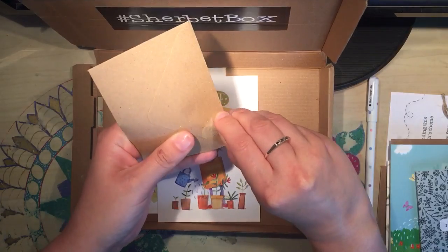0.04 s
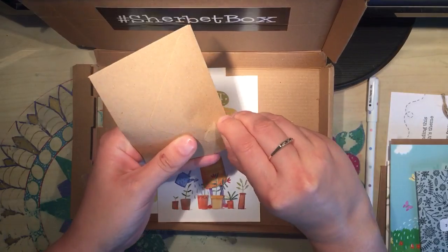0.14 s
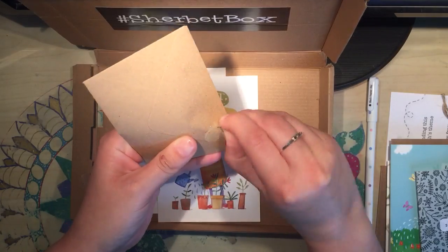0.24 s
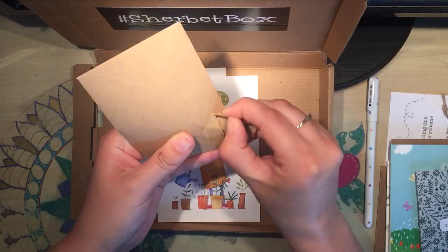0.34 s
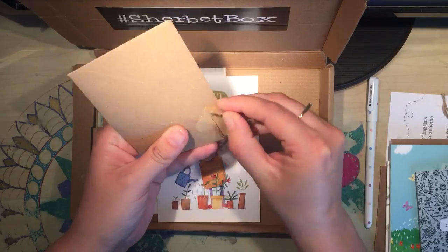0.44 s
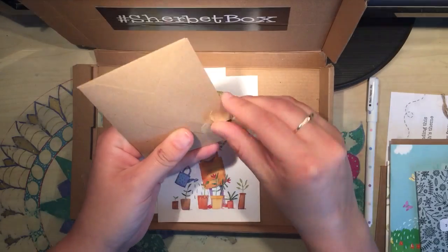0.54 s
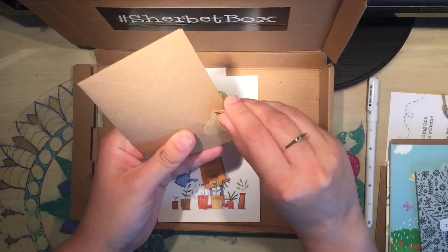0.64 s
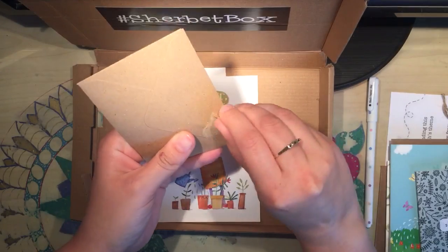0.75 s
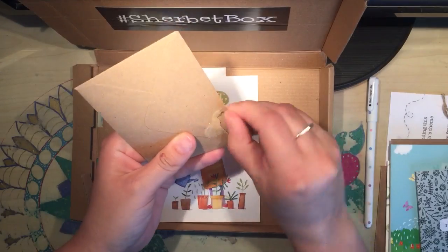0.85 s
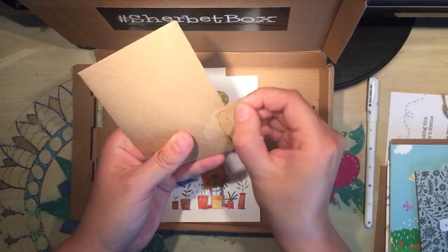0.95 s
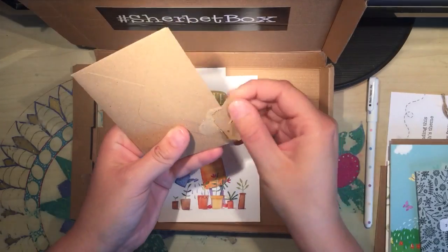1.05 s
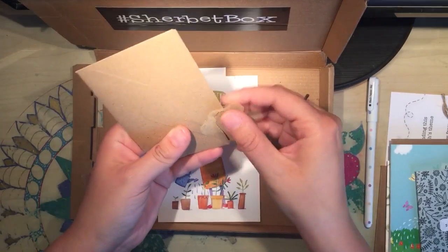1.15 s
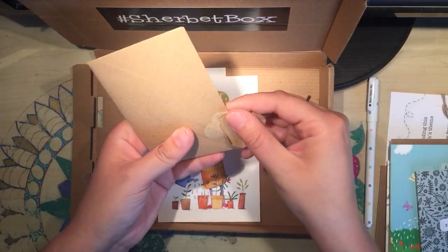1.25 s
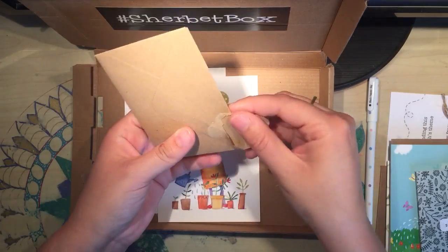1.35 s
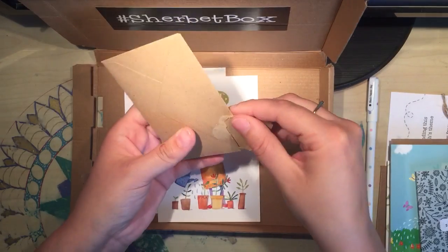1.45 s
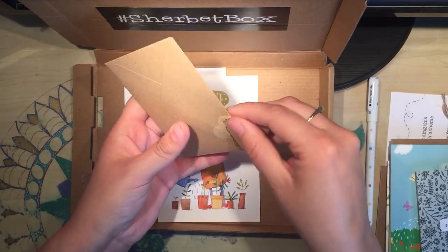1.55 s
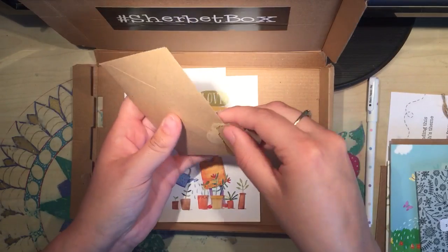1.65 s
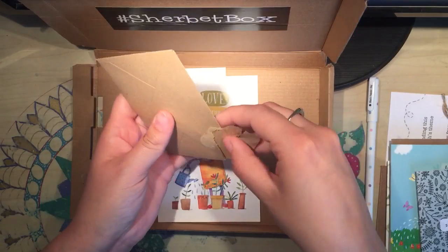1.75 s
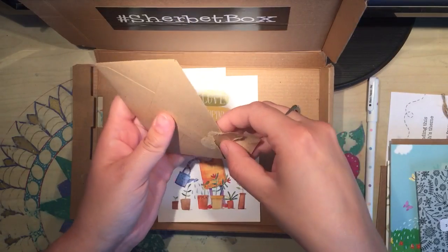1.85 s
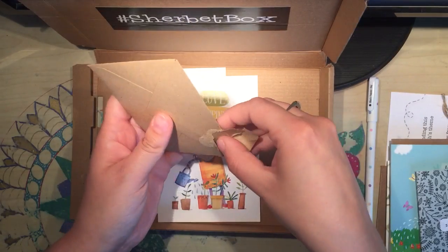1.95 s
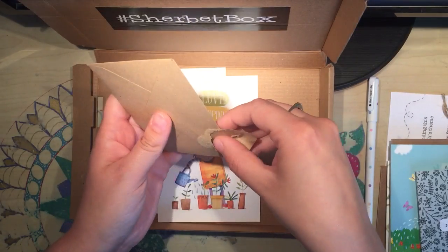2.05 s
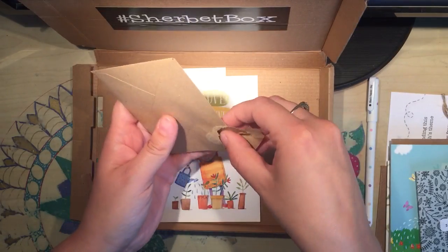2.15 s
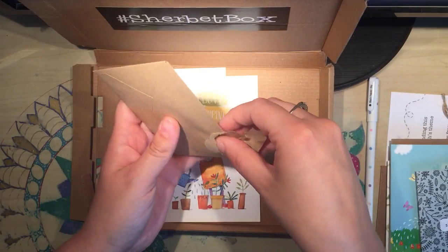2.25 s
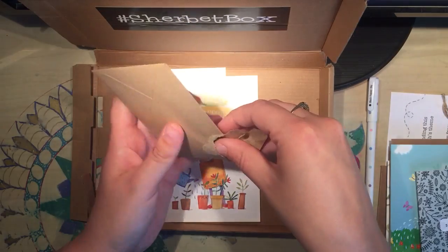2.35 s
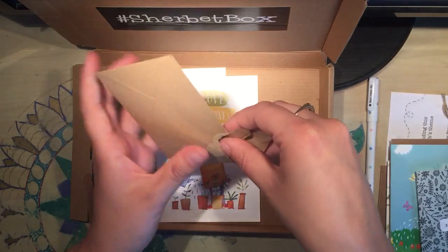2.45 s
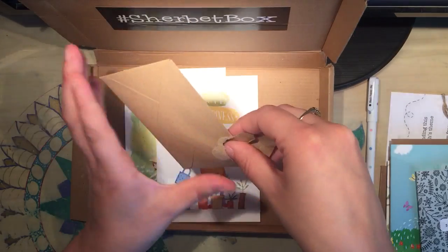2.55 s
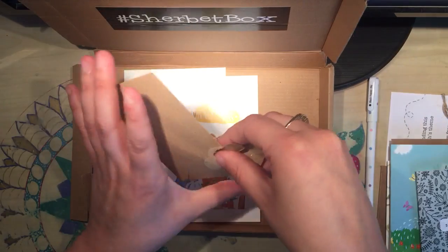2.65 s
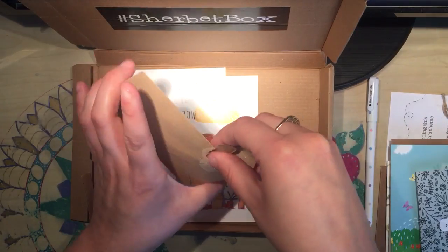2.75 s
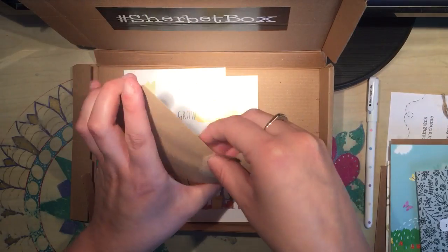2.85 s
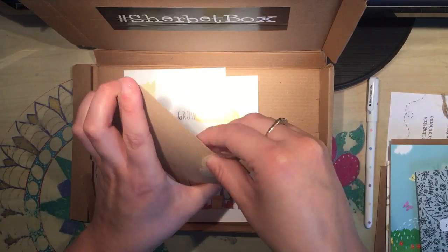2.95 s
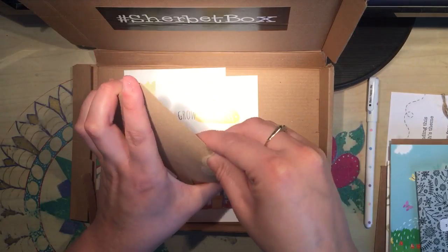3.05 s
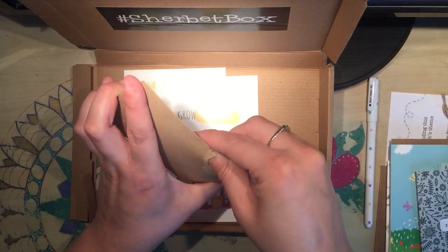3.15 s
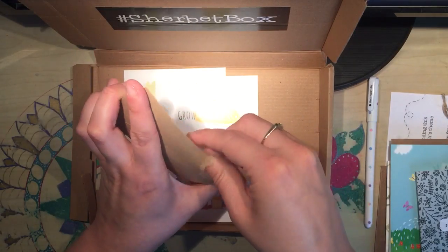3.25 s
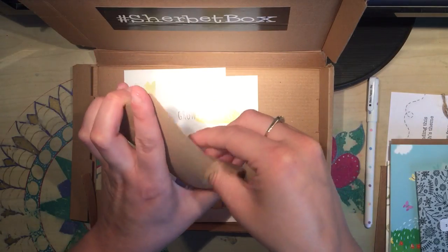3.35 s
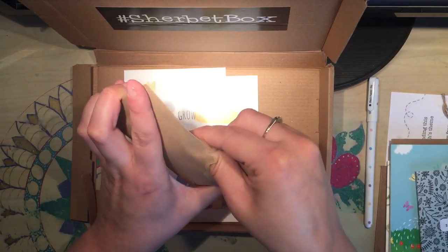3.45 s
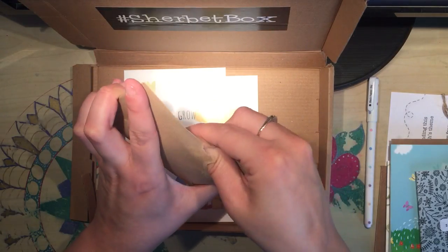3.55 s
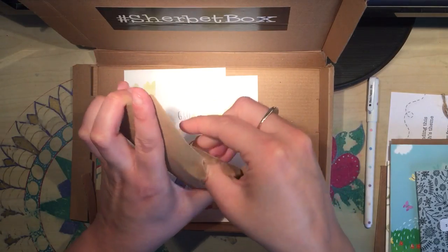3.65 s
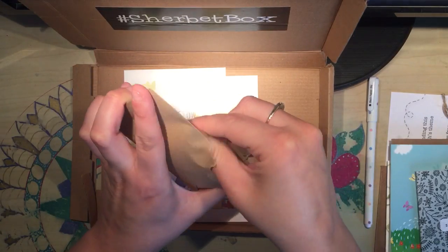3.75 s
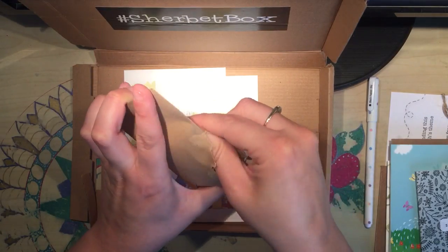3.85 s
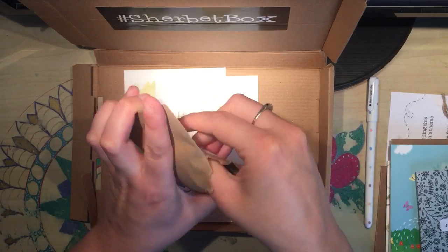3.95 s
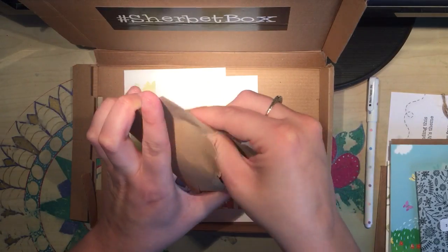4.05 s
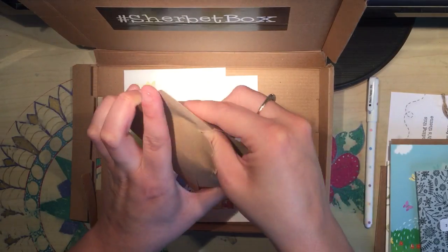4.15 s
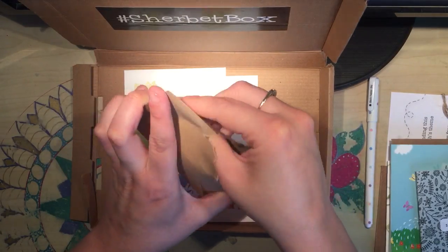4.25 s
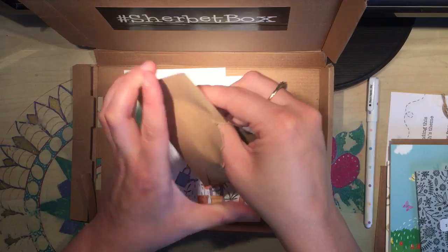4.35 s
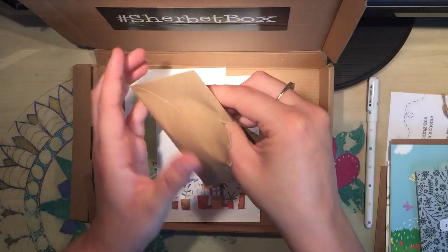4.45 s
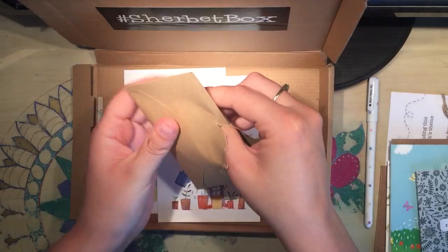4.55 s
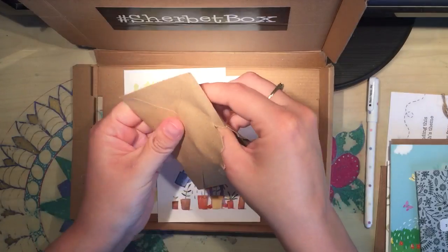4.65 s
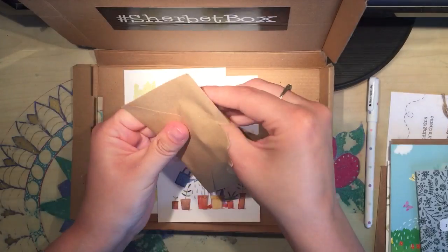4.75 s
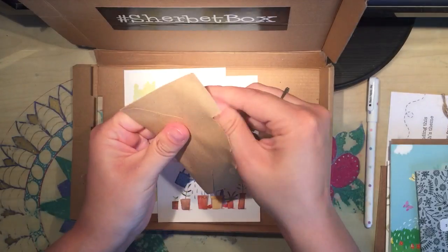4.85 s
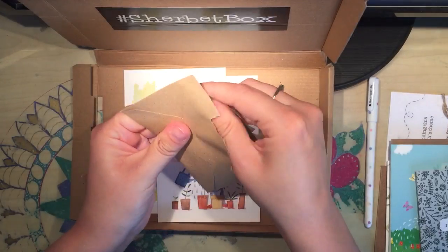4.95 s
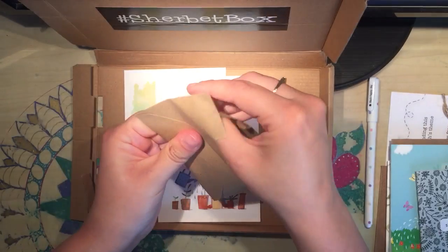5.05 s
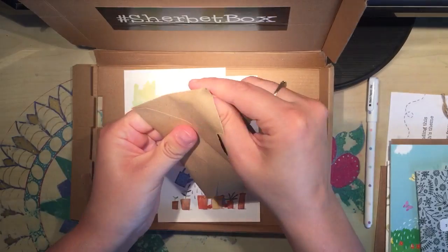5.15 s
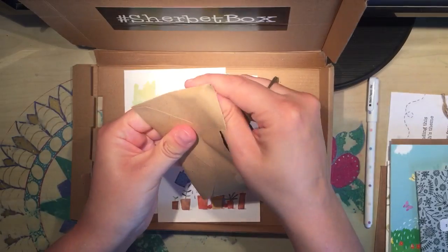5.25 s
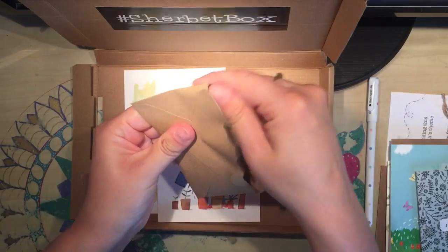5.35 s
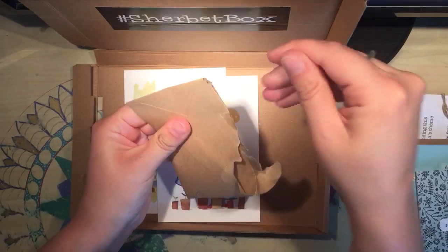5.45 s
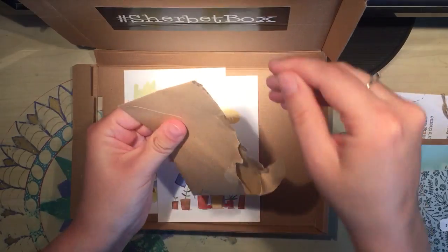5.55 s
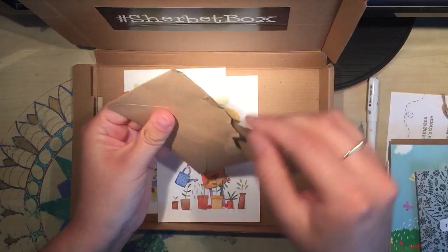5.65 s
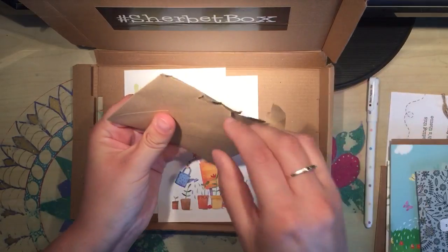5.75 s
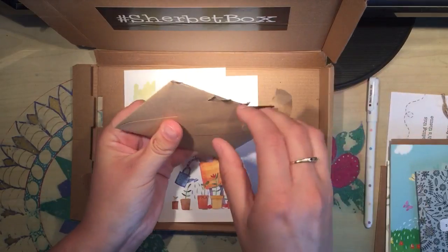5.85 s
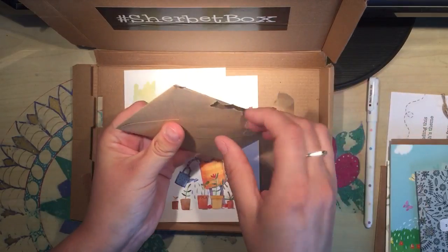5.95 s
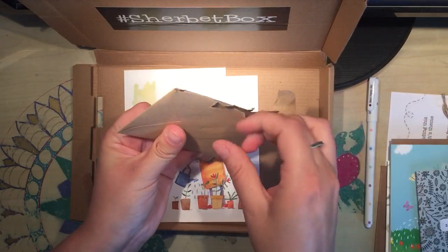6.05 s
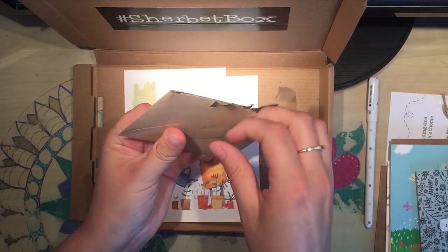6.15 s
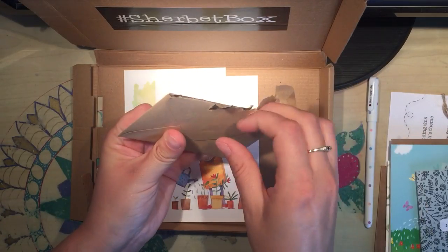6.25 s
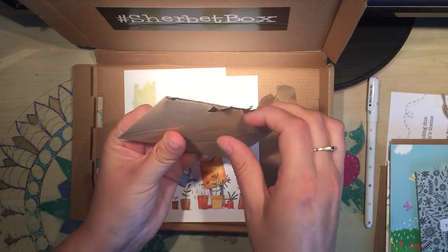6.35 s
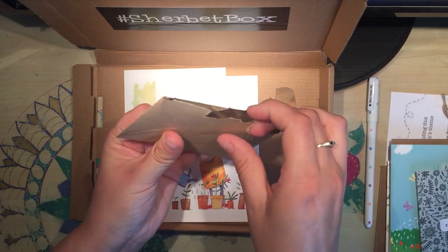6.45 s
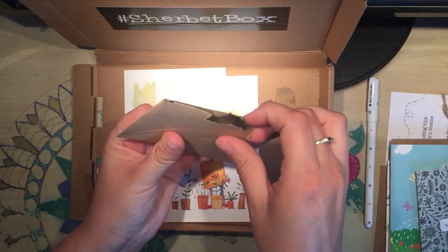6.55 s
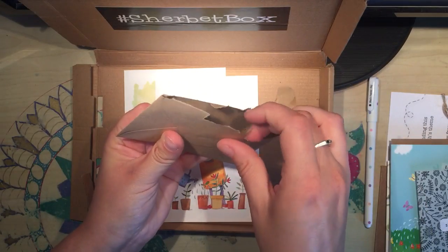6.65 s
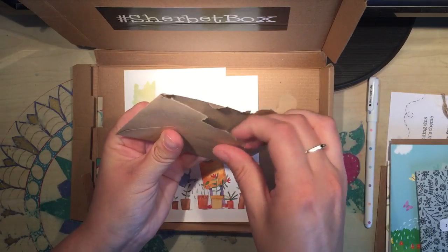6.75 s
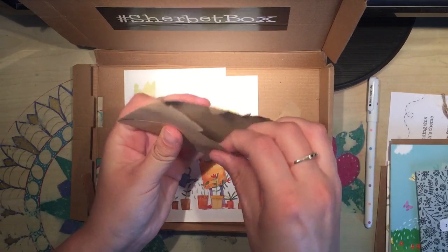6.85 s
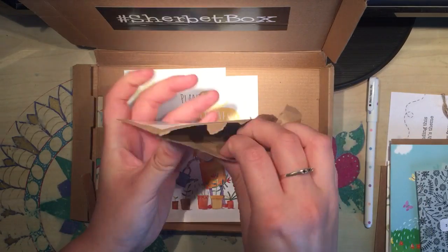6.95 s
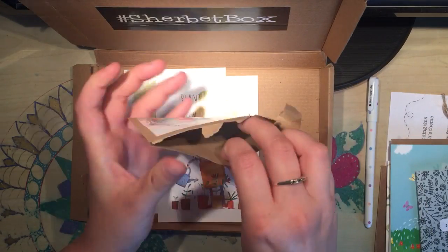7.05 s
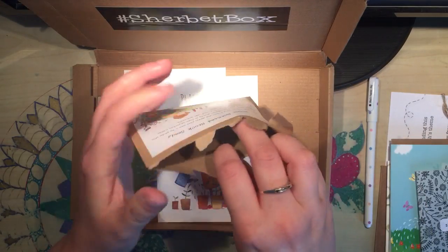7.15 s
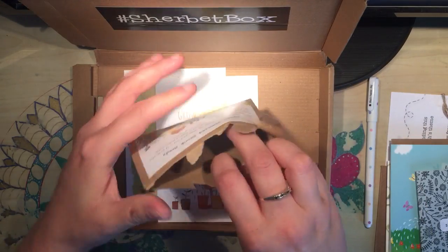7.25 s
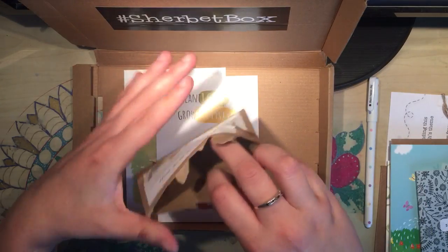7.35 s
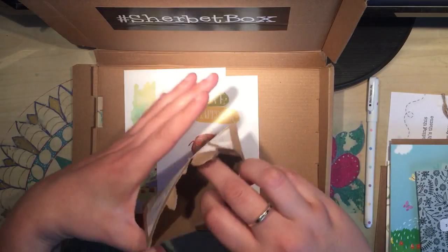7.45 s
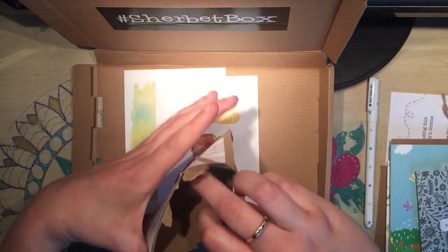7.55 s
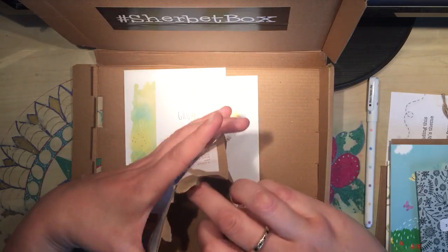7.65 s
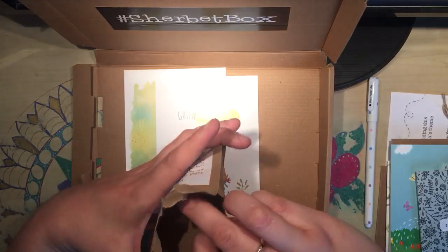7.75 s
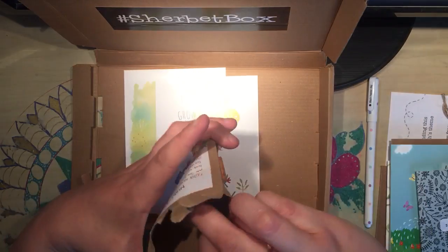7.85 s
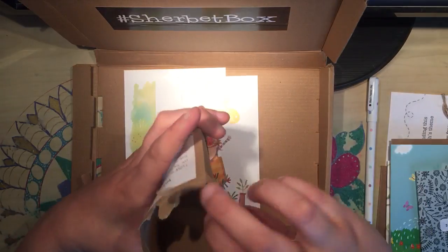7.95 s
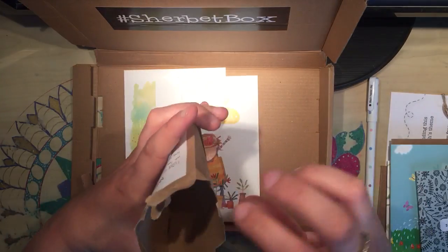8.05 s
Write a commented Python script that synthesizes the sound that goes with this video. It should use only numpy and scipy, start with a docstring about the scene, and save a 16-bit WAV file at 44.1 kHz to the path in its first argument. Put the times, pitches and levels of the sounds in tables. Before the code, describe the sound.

Fingers pick at a small stiff paper envelope with faint crackles, then tear it open in sharp, loud snaps before light rustling, close up indoors.

```python
"""Cracks of a small stiff paper envelope, picked at, peeled and torn open by two hands over a cardboard box, close
to a microphone: each is a burst of random slips exciting resonances of pocket, crisp sheet and body.
Finger scrapes use longer bursts of sparser ticks, and a faint rub of the held sheet runs beneath them.
Decaying low sines make the bumps on the box; narrow-band noise and hiss make the quiet room.
The paper alone also excites a short, dull reverberant tail."""
import sys
import numpy as np
from scipy import signal
from scipy.fft import rfft, irfft
from scipy.io import wavfile
from scipy.ndimage import uniform_filter1d

SR = 44100
rng = np.random.default_rng(int(sys.argv[2]) if len(sys.argv) > 2 else 0)


def generate_wav(signal):
    """Clip the signal to [-1, 1] and save it as 16-bit WAV at the path in sys.argv[1]."""
    frames = np.transpose(np.atleast_2d(signal))
    scaled = np.clip(frames, -1, 1) * 32767
    pcm = np.round(scaled).astype(np.int16)
    wavfile.write(sys.argv[1], SR, pcm)


N = 357647  # length in samples

# Levels below are those of the sources, ahead of the room tail and the microphone.
# Rumble in the low room resonances: f/Hz, width/Hz, rms level/dB before waver and swell
HUM_MODES = [(40, 30, -83.5), (90.5, 16, -71.5), (186, 21, -61), (255, 45, -65.5), (431.3, 53, -66.5),
             (132, 47, -68.5), (820, 17, -85)]
# Swell and sinking of the whole rumble: t/s, gain/dB
HUM_SWELL = [(0, 6.5), (.3, -2.5), (1, -4.5), (1.5, -2.5), (2.2, -1), (3, -1), (3.7, 3.5), (4.199, -4),
             (4.801, -1.5), (5.5, -5.5), (6.2, -1.5), (6.8, -6.5), (7.2, 2), (7.6, -2.5), (8.11, -0.5)]
# Spectral shape of the hiss: f/Hz, relative level/dB
HISS_SPECTRUM = [(290, -29.5), (500, 11), (603, -9.5), (629, -19), (815, -16.5), (1250, -18.5), (2390, -3),
                 (15500, -15.5)]
HISS_RMS_DB = -81.5
# Soft bumps reaching the box: t/s, peak level/dB, f/Hz, fade to -60 dB/ms (at least 30), table jolt peak level/dB
BUMPS = [(0.18, -49.5, 112, 150, -59), (1., -56, 82, 150, -56), (1.551, -37.5, 173, 118, -38),
         (2.443, -44, 200, 210, -48), (2.801, -49.5, 122, 152, -64), (2.985, -42.5, 185.5, 150, -62),
         (3.372, -47, 235, 150, -71), (3.672, -36.5, 173, 35, -54), (3.745, -37, 406, 25, -60),
         (3.765, -46, 129, 62, -58), (3.884, -41.5, 230, 65, -48), (4.24, -41.5, 424, 43, -65),
         (4.92, -45.5, 146, 146.5, -46), (5.249, -43.5, 237, 147, -53.5), (5.499, -42.5, 247, 82, -46.5),
         (7.521, -69, 93.7, 150, -51), (7.892, -47.5, 189, 150, -67)]
# Rustle of the held sheet, before its random waver: t/s, pocket level/dB, crisp level/dB, body level/dB
RUB_LEVELS = [(0.0, -64.5, -61, -70), (0.3, -69, -70, -80), (0.7, -71, -69, -75), (1.25, -78.5, -70.5, -75),
              (1.5, -76.5, -61.5, -73.5), (1.68, -75.5, -71, -73), (2.1, -72, -74.5, -74),
              (2.84, -70, -69, -75), (3.0, -57, -73, -60), (3.36, -71, -82, -76), (3.73, -50.5, -51.5, -64),
              (4.4, -57, -60, -62), (4.5, -80, -86, -82.5), (4.72, -66, -69, -64), (4.85, -50.5, -61, -65),
              (5.08, -41.5, -46, -52.5), (5.42, -54, -59, -60.5), (5.58, -71.5, -72.5, -80),
              (6.1, -88, -80, -69), (6.26, -75, -75, -84), (6.4, -55.5, -70, -62), (6.66, -62, -69.5, -70),
              (6.96, -63, -64, -68), (7.1, -64, -56, -81), (7.17, -79, -72, -76), (7.95, -72.5, -76, -74),
              (8.11, -47, -49, -51)]
# Resonances of the paper pocket: f/Hz, width/Hz, relative level/dB
POCKET_MODES = [(1637, 190, 0.5), (2320, 320, 0), (2880, 150, -5.5), (3460, 810, -8.5), (4076, 1400, -12),
                (2700, 2500, -10)]
# High resonances of the crisp sheet: f/Hz, width/Hz, relative level/dB
CRISP_MODES = [(6000, 1300, 3), (9100, 1900, 2.5), (13400, 5800, 3), (14900, 7500, -2.5)]
# Low resonances of the body: f/Hz, width/Hz, relative level/dB
BODY_MODES = [(855, 160, -3.5), (994, 300, -7), (570, 590, -9.5), (400, 33, -10)]
# The stiffest crease, high on the glued flap, lower in the torn pocket: t/s, f/Hz before CREASE_SPREAD
CREASE_PITCH = [(0, 6950), (1, 8500), (2.3, 8300), (2.9, 5720), (4.95, 5800), (5.2, 7710), (5.9, 6840),
                (6.1, 5600), (8.11, 6120)]
CREASE_SPREAD = 1.115  # frequency ratio of one standard deviation
# Scrapes and crinkles of fingers on paper: peak t/s, 10 dB rise/ms, 10 dB fall/ms, pocket level/dB,
# panel f/Hz, crisp level/dB, body level/dB, small cracks relative to the scrape: level/dB
SCRAPES = [(0.03, 33, 33, -57.5, 3150, -77, -68, 3), (0.234, 17.5, 26.5, -54.5, 4100, -56.5, -64, 7.5),
           (0.361, 34, 31, -53, 3840, -49.5, -66, 8), (0.462, 68.5, 48.5, -45, 2870, -35, -57, 7),
           (0.607, 18, 27, -46, 2420, -50.5, -52.5, -3), (0.68, 15, 17, -69, 2420, -62, -64, -5),
           (0.725, 12, 11.5, -55.5, 2770, -51, -76, -2), (0.756, 15, 16, -52, 1540, -48.5, -57, -3),
           (0.84, 27, 21, -54.5, 2380, -64, -70, -9), (0.93, 15, 16, -56, 2300, -46, -64, -1),
           (1.002, 42, 54, -45, 913, -39, -57, 3), (1.09, 11, 13, -54, 2600, -56, -84, -7),
           (1.18, 31, 19, -58, 3130, -51, -62.5, -5), (1.303, 10, 7, -57, 2440, -62, -66, -4),
           (1.352, 10, 15, -63.5, 2650, -81, -72, 1.5), (1.579, 30, 20, -67, 4200, -47, -58, -17),
           (1.82, 70, 45, -68, 3840, -60.5, -74, -6), (1.905, 41, 21, -56.5, 2540, -50, -74, 4.5),
           (2.01, 17, 18, -64, 2480, -68, -71, 3), (2.11, 12, 33, -73, 3860, -63, -69, 4),
           (2.189, 11, 20, -58.5, 2470, -61.5, -73, 2), (2.309, 19.5, 30, -53, 3820, -59, -68, 4),
           (2.443, 9.9, 78, -58, 1670, -55, -70, 6.5), (2.574, 31.7, 38, -50, 2800, -44.5, -78, 7.5),
           (2.783, 6.2, 14.5, -57.5, 4470, -53.5, -79, 0), (2.97, 57, 37, -48.5, 1730, -45.5, -68, 0),
           (3.029, 50, 18, -46.5, 2500, -59, -52.5, 6.5), (3.204, 54, 79, -45.5, 1740, -52, -54.5, 7.5),
           (3.43, 50, 24, -38, 1780, -44, -52.5, 5.5), (3.516, 51, 46, -45, 1840, -51.5, -56.5, 9.5),
           (3.582, 25, 29, -44, 1870, -41.5, -50, -1), (3.668, 7, 12, -47, 1810, -43, -58, 1),
           (3.784, 43, 33.4, -40.5, 1735, -43, -50, 3), (3.89, 19.4, 23.4, -28, 1680, -35, -35.5, 0),
           (3.96, 26, 25, -51, 1720, -66, -55, 0), (4.077, 49.5, 20.7, -39.5, 1680, -45.5, -47.5, 4.5),
           (4.161, 27, 45, -35.5, 1590, -38, -40, 4), (4.25, 24, 40, -59, 1680, -80, -56, -9),
           (4.346, 48, 94, -44, 1630, -52, -48.5, 9), (4.482, 46, 17, -53, 1700, -55.5, -56, 6),
           (4.72, 42, 28, -54.5, 1640, -55, -58.5, 2.5), (4.8, 15, 61, -44.5, 1440, -57, -49.5, -4),
           (4.933, 18.7, 22.5, -30.5, 1590, -32, -33.5, -5), (4.99, 18, 14.7, -29, 3460, -31.5, -47, 3),
           (5.263, 7.8, 32, -37, 3200, -35.5, -50, 7.5), (5.443, 32, 62, -48, 3180, -54, -61, 12),
           (5.492, 24, 59, -44, 2115, -41, -48, 9.5), (5.91, 11.6, 39.5, -55, 2430, -52.5, -62, 2),
           (6.001, 21, 37, -59, 2370, -73, -80.5, -6), (6.069, 21, 13, -52.5, 2720, -64, -70, 7),
           (6.115, 15, 20, -47.5, 1410, -55, -59, -1), (6.17, 30.4, 32, -50.5, 2370, -48, -55, 8),
           (6.225, 10, 12.4, -51.5, 2970, -54, -60, -9), (6.359, 57, 49, -54, 1980, -59.5, -58, 5),
           (6.456, 44, 20, -44.5, 1700, -48, -49, 1), (6.525, 39, 56, -57, 2930, -61, -76, -1),
           (6.606, 25, 11, -46.5, 3160, -55, -67, 3), (6.73, 9.9, 10.6, -40, 1590, -53, -52, 1.5),
           (6.8, 19, 69, -54, 3630, -66.5, -79, 7), (6.909, 44, 22, -51, 2260, -56.5, -57.5, 4),
           (6.995, 15, 56, -56, 2330, -55, -74, 0), (7.09, 64, 63, -59, 3630, -54.5, -75, 3),
           (7.18, 40, 60, -65.5, 1600, -78, -75, -4), (7.224, 12, 72, -58.5, 1660, -59, -81, 7),
           (7.299, 12, 76, -46.5, 1670, -56.5, -54.5, 2), (7.458, 34, 26, -53.5, 1640, -55.5, -63.5, 8.5),
           (7.548, 33, 27, -54, 1640, -61.5, -57, 6), (7.633, 31, 13.4, -63, 1034, -64, -53, 7),
           (7.71, 26, 32, -70, 2400, -64, -68, -1), (7.831, 72, 75, -54, 1075, -57.5, -61, 3),
           (7.997, 5.2, 19, -70, 1150, -65, -57, -10), (8.055, 10, 21, -49.5, 3340, -56, -56, -1),
           (8.095, 15, 30, -57, 3400, -52, -58, -1)]
# Loud cracks of creases and glue: peak t/s, 10 dB fall/ms, pocket level/dB, panel f/Hz,
# crisp level/dB, body level/dB
LOUD_CRACKS = [(0.212, 2.4, -45.5, 2870, -55, -49), (0.346, 4.7, -56, 4000, -46, -60),
               (0.434, 2, -41, 920, -28, -36.5), (0.46, 13, -46, 3010, -31, -45),
               (0.497, 1.3, -38, 904, -37, -41.5), (0.52, 1.9, -51, 2940, -36, -53),
               (0.612, 18, -45.5, 2090, -46, -57), (0.941, 13, -41.5, 2220, -33, -48.5),
               (0.959, 10.6, -38.5, 2510, -31.5, -42), (0.997, 4.7, -46, 930, -28.5, -43),
               (1.552, 3.7, -53, 900, -48, -45.5), (2.1, 7.1, -52.5, 3430, -50, -81),
               (2.115, 3.1, -45, 3800, -62, -65), (2.177, 2.9, -54, 2450, -71, -55),
               (2.436, 4.2, -35.5, 1790, -35.5, -39), (2.486, 3.4, -40, 844, -48, -42),
               (2.567, 6.8, -42, 3000, -34, -71), (2.78, 6, -100, 3940, -54, -70),
               (2.999, 1.5, -35.5, 920, -62, -30.5), (3.023, 2.6, -29.5, 2140, -64, -29.5),
               (3.033, 2.6, -61, 870, -66, -31.5), (3.109, 11, -43, 2540, -43.5, -59),
               (3.168, 1.7, -23.5, 1820, -33, -44), (3.192, 3.3, -25, 1740, -33.5, -42),
               (3.212, 2.4, -35, 1720, -35, -42), (3.233, 8.5, -36, 1770, -41.5, -43),
               (3.286, 2.9, -33.5, 1730, -44.5, -67), (3.386, 2.2, -36, 1760, -37, -31),
               (3.505, 2.9, -37, 1800, -67, -38), (3.522, 0.9, -29, 1760, -23.5, -42),
               (3.572, 1.9, -20, 1790, -48, -53), (3.583, 5.7, -22, 1880, -31, -38.5),
               (3.656, 1.64, -17.5, 1730, -18.5, -41), (3.673, 3.8, -31.5, 1830, -31, -42.5),
               (3.771, 1.7, -53, 1610, -47, -38.5), (3.864, 0.67, -22, 1700, -31, -57),
               (3.88, 0.88, -30, 1740, -15, -40), (3.886, 3.3, -18.5, 1860, -20.5, -43),
               (3.89, 10.1, -24.5, 1720, -22.5, -51), (3.907, 3.2, -36, 1670, -47.5, -47),
               (4.136, 0.83, -11.5, 1700, -24, -29), (4.151, 2, -10.5, 1660, -17, -19.5),
               (4.158, 3, -24, 1160, -49, -21.5), (4.164, 3.5, -24, 1640, -27, -20),
               (4.176, 1, -13, 1670, -34, -43), (4.211, 3.9, -40.5, 1320, -38, -49),
               (4.338, 4.6, -35, 834, -44, -30), (4.387, 2.4, -21, 1600, -20.5, -28.5),
               (4.532, 1.7, -47, 1650, -84, -55), (4.607, 1.4, -46, 1625, -80, -65),
               (4.639, 2.5, -53, 1700, -74, -67), (4.667, 3.6, -43, 1670, -53, -74.5),
               (4.72, 6, -37.5, 1550, -58, -39.5), (4.791, 2.7, -17.5, 1595, -63, -23.5),
               (4.912, 1.5, -22.5, 1780, -25.5, -49), (4.924, 5.5, -17.5, 1840, -25, -34),
               (4.937, 0.89, -3.5, 1740, -8.5, -14.5), (4.943, 3, -17, 3520, -15.5, -32),
               (4.962, 7.2, -36.5, 1700, -28, -42), (4.982, 2.8, -21, 3480, -19, -35),
               (4.992, 2.9, -17, 3470, -26.5, -38), (5.0606, 1.1, -11.5, 1716, -14, -20.5),
               (5.097, 5, -42, 1680, -52, -41), (5.214, 3.9, -23, 3160, -21, -43.5),
               (5.232, 3.3, -19.5, 1640, -20.5, -34), (5.253, 3.4, -15.5, 3140, -16, -28),
               (5.263, 3, -24.5, 2940, -22, -42), (5.275, 2.1, -13.5, 3010, -20, -26),
               (5.403, 2.7, -36, 3340, -32, -38.5), (5.421, 2.6, -35.5, 2870, -29.5, -59),
               (5.438, 3.8, -29, 1776, -30.5, -44.5), (5.447, 4.9, -31, 2780, -24.5, -38.5),
               (5.481, 2.8, -16, 2240, -28, -34), (5.493, 1.2, -21, 3620, -44, -50),
               (5.508, 2.3, -25, 950, -50.5, -26.5), (5.518, 8.6, -39.5, 3380, -35, -56),
               (5.54, 7.4, -42.5, 1190, -43, -47), (5.94, 3.2, -42, 2170, -65, -79),
               (6.124, 6.3, -32, 1460, -41, -41.5), (6.218, 4.7, -39.5, 2950, -51, -54),
               (6.421, 1.1, -27.5, 1610, -38, -53), (6.433, 14, -37.5, 3730, -48, -52),
               (6.449, 3.4, -34.5, 1680, -51, -66), (6.472, 1.7, -31.5, 1470, -59, -42),
               (6.52, 7.5, -41, 3000, -51.5, -64), (6.734, 2.3, -28, 1660, -56, -28.5),
               (6.887, 9.9, -42.5, 1900, -63, -60), (6.91, 10.3, -42, 2370, -51, -57),
               (6.983, 4.6, -43.5, 1570, -43, -45.5), (7.131, 2.2, -46.5, 4240, -40.5, -83),
               (7.219, 7.9, -50.5, 4200, -40, -68), (7.297, 1.4, -17.5, 1900, -57, -23.5),
               (7.541, 4, -41.5, 1610, -55, -47), (7.759, 7.2, -39, 950, -44, -39.5),
               (7.786, 2.8, -33.5, 1070, -36, -53), (7.798, 4.4, -30.5, 1065, -38, -29.5),
               (7.824, 5, -23.5, 1036, -34, -23.5), (7.84, 13, -45, 1040, -57, -39),
               (7.902, 5.4, -41.5, 3320, -56, -45), (7.994, 8.5, -45.5, 1010, -46.5, -48.5)]

HOLLOW_DB = 6.0  # extra ring of panel notes below 1200 Hz in the hollow of the pocket
CRACK_RISE_MS, CRACK_RISE_SHARE = 0.6, 0.25  # rise = fixed time + share of the fall
SMALL_FALL_MS, SMALL_SPREAD_DB = 2.43, 3.0  # mean 10 dB fall; level spread, plus or minus
ROOM_T60_S, ROOM_DB, ROOM_TOP_HZ = 0.28, -23.5, 6300  # decay, tail gain, treble corner
MIC_BASS_HZ, MIC_TOP_HZ, MIC_CEILING = 45, 15850, 0.75  # ceiling in full-scale units


def undb(db):
    """A level in dB is twenty times the logarithm of its amplitude ratio."""
    return 10 ** (np.asarray(db) / 20)


def level(x, db):
    """Root-mean-square amplitude sets the level."""
    return x * undb(db) / np.sqrt(np.mean(x ** 2))


def band(x, hz, width):
    """A single resonance passes its centre frequency with unit gain."""
    return signal.lfilter(*signal.iirpeak(hz, hz / width, SR), x)


def ring(x, modes):
    """Resonances adding in power define a causal minimum-phase response that keeps the power of white noise."""
    f = np.fft.rfftfreq(2048, 1 / SR) + 1  # offset avoids division by zero
    power = 0
    for hz, width, db in modes:
        detuning = (f ** 2 - hz ** 2) / (f * width)
        power = power + undb(2 * db) / (1 + detuning ** 2) ** 1.254
    # folding the cepstrum onto positive time makes the response causal
    cepstrum = irfft(np.log(power) / 2)
    cepstrum[1:1024] = 2 * cepstrum[1:1024]
    cepstrum[1025:] = 0
    response = irfft(np.exp(rfft(cepstrum)))[:1024]
    unit_response = response / np.sqrt(np.sum(response ** 2))
    return signal.fftconvolve(x, unit_response)[:len(x)]


def walk(rate):
    """Random levels held for 1 / rate s and averaged twice give a slow fluctuation with spread near 1."""
    hold = int(SR / rate)
    steps = np.repeat(rng.standard_normal(N // hold + 1), hold)
    return 1.71 * uniform_filter1d(uniform_filter1d(steps, hold), hold)[:N]


def add(out, s, x):
    """Superposition adds a sound x to the mixture from time s onward."""
    i = int(s * SR)
    out[i:i + len(x)] += x[:N - i]


def grain(per_s, spread_db, tick_ms, smooth_db, patchy_db):
    """Stick-slip friction: decaying ticks of very unequal size over a smoother skin-on-paper hiss, all uneven."""
    slips = rng.random(N) < per_s / SR
    size = undb(spread_db * rng.exponential(size=N))
    decay = np.exp(-1000 / (tick_ms * SR))  # per sample; tick_ms is the fall to 1/e
    ticks = signal.lfilter([1], [1, -decay], slips * size)
    strength = (level(ticks, 0) + undb(smooth_db)) * undb(patchy_db * walk(45))
    return level(strength * rng.standard_normal(N), 0)


def bursts(table, push, bend, panel_db, panel_q, crisp_ring_db, crisp_q, facet_db, facet_q, count=14):
    """Forced vibration: each burst of slips excites the panel's own notes along with the fixed resonances."""
    out = np.zeros(N)
    # small facets of each new fold ring at chance pitches, 1300 to 14300 Hz
    facets = 1300 * 11 ** rng.random((len(table), count))
    stiff = np.interp([row[0] for row in table], *np.transpose(CREASE_PITCH))
    stiff = stiff * CREASE_SPREAD ** rng.standard_normal(len(table))
    for row, facet_pitches, crisp_hz in zip(table, facets, stiff):
        s, rise, fall, pocket_db, panel_hz, crisp_db, body_db = row
        rise, fall = max(rise, .2), max(fall, .5)
        start = max(s - 4 * rise / 1000, 0)
        first = int(start * SR)
        samples = np.arange(int((4 * rise + 6 * fall + 30) * SR / 1000))
        ms = 1000 * (start - s) + samples * 1000 / SR  # time relative to the peak
        # the level is 10 dB down one rise before and one fall after the peak
        distance = np.where(ms < 0, -ms / rise, ms / fall)
        envelope = undb(-10 * distance ** bend)[:N - first]
        slips = push[first:][:len(envelope)] * envelope
        rings = [(panel_hz, panel_hz / panel_q, panel_db + HOLLOW_DB * (panel_hz < 1200)),
                 (crisp_hz, crisp_hz / crisp_q, crisp_ring_db)]
        rings += [(f, f / facet_q, facet_db) for f in facet_pitches]
        # neighbouring groups swing in opposite sign, so no hole opens between them
        groups = ((BODY_MODES, body_db, 0, 1200, 1),
                  (POCKET_MODES, pocket_db, 1200, 4500, -1),
                  (CRISP_MODES, crisp_db, 4500, SR, 1))
        for modes, db, lo, hi, sign in groups:
            x = ring(slips, modes + [m for m in rings if lo <= m[0] < hi])
            gain = undb(db) * np.sqrt(np.sum(envelope ** 2) / np.sum(x ** 2))
            add(out, start, sign * x * gain)
    return out


def room_tone():
    """Distant rumble is noise selected by low room resonances, each wavering alone, over a thin hiss."""
    hum = np.zeros(N)
    for hz, width, db in HUM_MODES:
        narrow = band(band(rng.standard_normal(N), hz, width), hz, 3.2 * width)
        hum += level(narrow, db) * undb(5.0 * np.tanh(walk(14)))  # waver within 5 dB either way
    swell = np.interp(np.arange(N) / SR, *np.transpose(HUM_SWELL))
    hz, db = np.transpose(HISS_SPECTRUM)
    colour = np.interp(np.log(np.fft.rfftfreq(N, 1 / SR) + 1), np.log(hz), db)
    hiss = irfft(rfft(rng.standard_normal(N)) * undb(colour), N)
    return hum * undb(swell) + level(hiss, HISS_RMS_DB)


def room(x):
    """Reverberation: box walls and the small room answer with a short, dull, exponentially decaying tail."""
    t = np.arange(SR // 2) / SR
    tail = rng.standard_normal(len(t)) * np.exp(-np.log(1000) * t / ROOM_T60_S)
    tail = tail * (t > .003)  # the answer arrives after 3 ms
    tail = signal.lfilter(*signal.butter(1, ROOM_TOP_HZ, fs=SR), tail)
    return undb(ROOM_DB) * signal.fftconvolve(x, tail / np.sqrt(np.sum(tail ** 2)))[:N]


def bumps():
    """Damped oscillation: a soft push gives the cardboard low cycles and a rattle, over a deep table jolt."""
    t, out = np.arange(SR // 3) / SR, np.zeros(N)
    for s, db, hz, fade, deep_db in BUMPS:
        decay = np.exp(-np.log(1000) * t * 1000 / max(fade, 30))
        swing = decay * (1 - np.exp(-t / 0.0039))  # soft onset
        rattle = 0.67 * swing * np.sin(2 * np.pi * 3.3 * hz * t)
        thud = swing * (np.sin(2 * np.pi * hz * t) + rattle)
        jolt = swing ** 2.0 * (np.sin(2 * np.pi * 90 * t) + 0.34 * np.sin(2 * np.pi * 55 * t))
        thud = undb(db) * thud / np.abs(thud).max()
        add(out, s, thud + undb(deep_db) * jolt / np.abs(jolt).max())
    return out


def rub():
    """Light friction of the hands holding the sheet keeps all its resonances faintly excited."""
    s, *columns = np.transpose(RUB_LEVELS)
    push = grain(per_s=210.0, spread_db=1.5, tick_ms=4.8, smooth_db=3.5, patchy_db=2.0)
    out = np.zeros(N)
    for db, modes, sign in zip(columns, (POCKET_MODES, CRISP_MODES, BODY_MODES), (-1, 1, 1)):
        wavering_db = np.interp(np.arange(N) / SR, s, db) + 0.9 * walk(30)
        out += sign * undb(wavering_db) * ring(push, modes)
    return out


def scrapes():
    """Sliding friction: fingers slide and fibres part for tens of ms, then stop rather suddenly."""
    push = grain(per_s=130.0, spread_db=6.5, tick_ms=3.3, smooth_db=0.5, patchy_db=1.5)
    return bursts([row[:-1] for row in SCRAPES], push, bend=1.78, panel_db=12.0, panel_q=14.0,
                  crisp_ring_db=9.0, crisp_q=5.1, facet_db=6.5, facet_q=120.0)


def small_cracks(count=4):
    """Scattered release: each scrape spreads cracks of chance size over its length, in its own colour."""
    rows = []
    for row, chances in zip(SCRAPES, rng.random((len(SCRAPES), count, 4))):
        s, rise, fall, pocket_db, hz, crisp_db, body_db, over_db = row
        for k, (place, size, length, pitch) in enumerate(chances):
            ms = (rise + fall) * (k + place) / count - rise
            t = s + ms / 1000
            db = over_db - 10 * max(-ms / rise, ms / fall) ** 2
            db += SMALL_SPREAD_DB * (2 * size - 1)
            if 0 < t < N / SR:
                rows.append((t, SMALL_FALL_MS * (.5 + length), pocket_db + db,
                             hz * 1.5 ** (pitch - .5), crisp_db + db, body_db + db))
    return rows


def cracks():
    """Sudden release of strain: creases snap through and glue lets go in short bursts of dense slips."""
    push = grain(per_s=3500.0, spread_db=5.5, tick_ms=0.6, smooth_db=-3.0, patchy_db=7.5)
    rows = []
    for s, fall, *colour in LOUD_CRACKS + small_cracks():
        rows.append((s, CRACK_RISE_MS + CRACK_RISE_SHARE * fall, fall, *colour))
    return bursts(rows, push, bend=0.88, panel_db=13.0, panel_q=11.7,
                  crisp_ring_db=8.5, crisp_q=23.0, facet_db=2.0, facet_q=20.2)


def scene():
    """Superposition of paper, its room tail, box and room tone at one microphone."""
    paper = cracks() + scrapes() + rub()
    return (paper + room(paper) + bumps() + room_tone())[None]


def record(dry):
    """Limited bandwidth and saturation: the microphone thins deep bass, rounds loud peaks and cuts the top."""
    thin = signal.sosfilt(signal.butter(1, MIC_BASS_HZ, "high", fs=SR, output="sos"), dry)
    rounded = MIC_CEILING * np.tanh(thin / MIC_CEILING)
    return signal.sosfilt(signal.ellip(10, .2, 75, MIC_TOP_HZ, fs=SR, output="sos"), rounded)


dry = scene()
out = record(dry)
generate_wav(out)
```